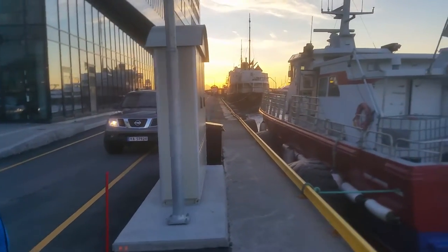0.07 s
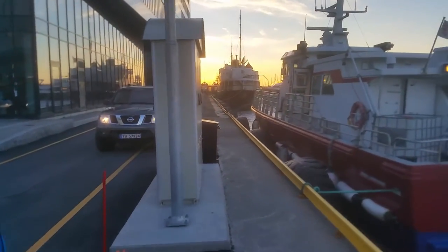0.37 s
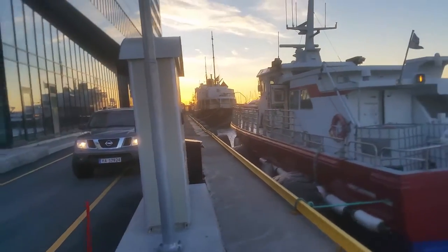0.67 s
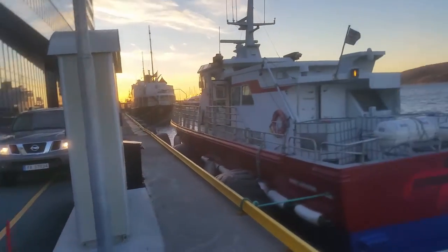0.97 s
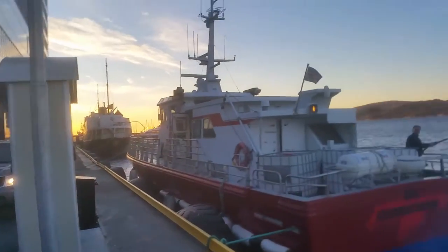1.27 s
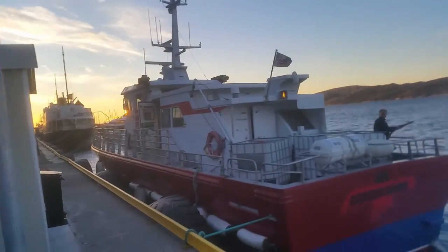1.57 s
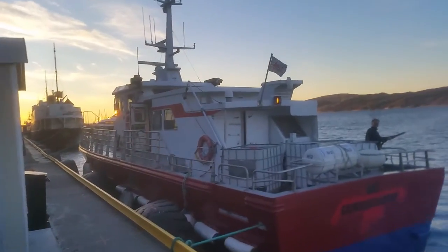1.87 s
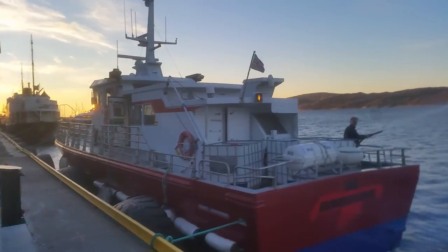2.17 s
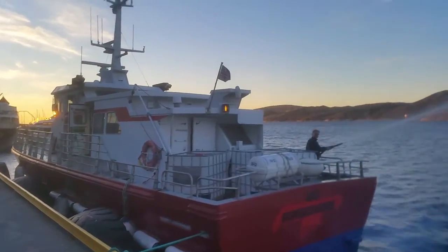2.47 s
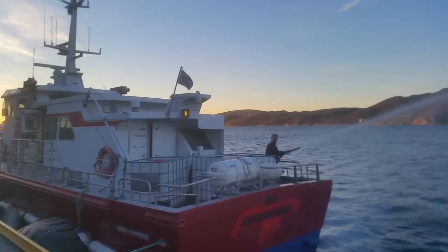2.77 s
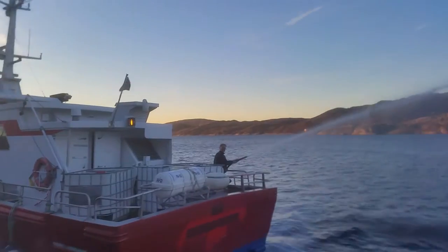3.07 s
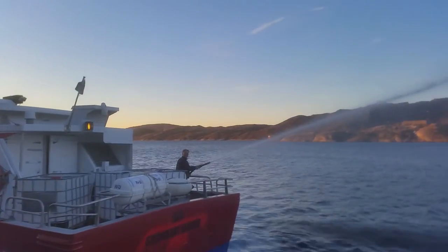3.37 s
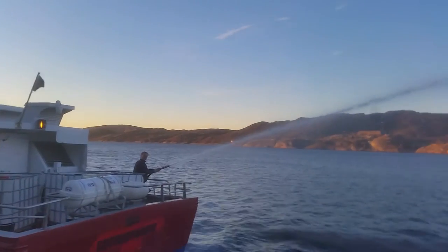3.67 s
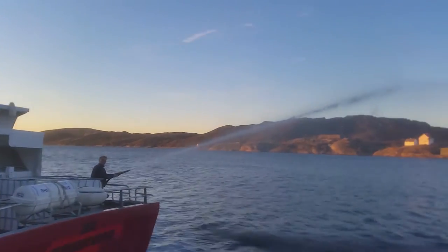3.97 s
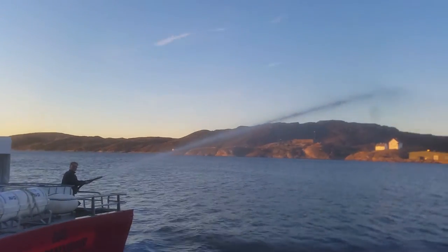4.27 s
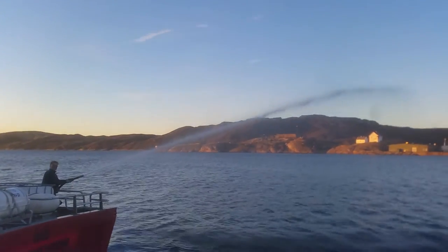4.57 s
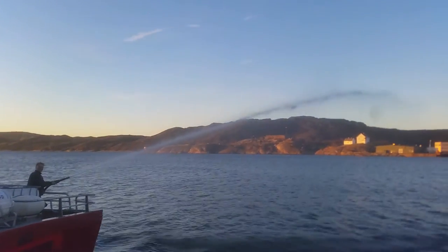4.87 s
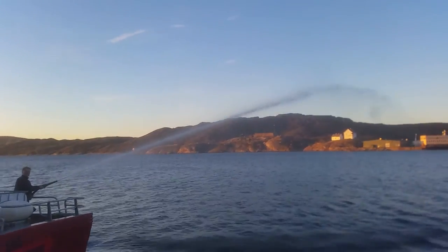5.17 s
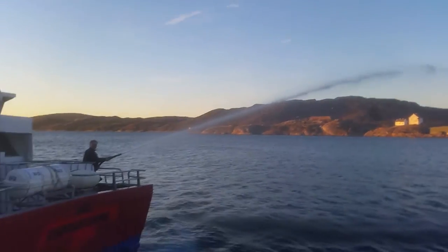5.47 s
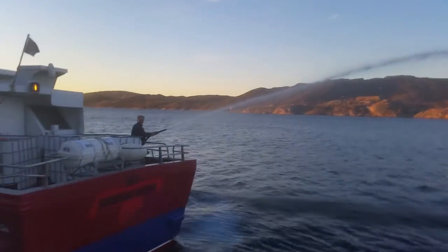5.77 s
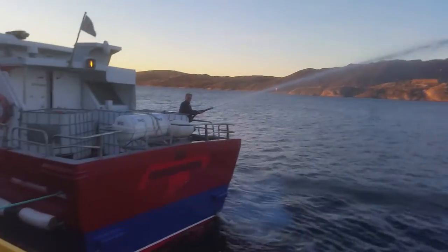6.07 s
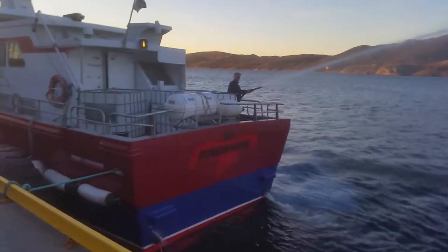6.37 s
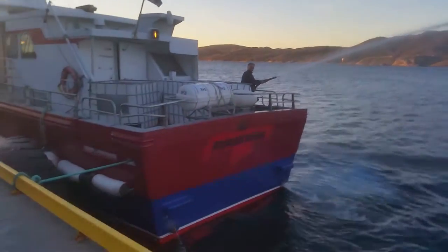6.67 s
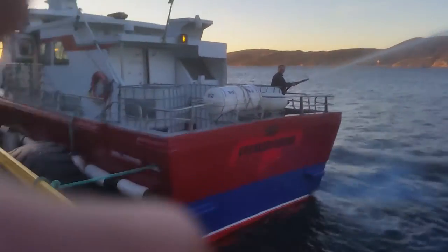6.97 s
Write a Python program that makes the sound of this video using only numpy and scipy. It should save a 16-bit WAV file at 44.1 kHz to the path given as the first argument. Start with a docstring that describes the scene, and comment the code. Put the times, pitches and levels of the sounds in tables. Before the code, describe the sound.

Low throbbing boat engine, steady pump whine and spray hiss at a quay, with wind gusts and small handling clicks.

```python
"""Workboat throwing a water jet.

A moored boat runs its diesel and fire pump while a deck monitor throws a jet over the harbour.
The exhaust throbs once an engine cycle, the pump whines, machinery roars and the spray hisses.
A hand-held phone on the quay comes out from behind a pillar and turns seaward, then partly back.
Wind buffets its two microphone ports and a finger brushes it."""
import sys
import numpy as np
from scipy import signal
from scipy.fft import rfft, irfft
from scipy.io import wavfile
from scipy.ndimage import map_coordinates

SR = 44100
rng = np.random.default_rng(int(sys.argv[2]) if len(sys.argv) > 2 else 0)


def bounce(signal):
    """Save signal as a 16-bit WAV file at the path given by the first command-line argument."""
    frames = np.transpose(np.atleast_2d(signal))
    limited = np.clip(frames, -1, 1)
    pcm = np.round(limited * 32767).astype(np.int16)
    wavfile.write(sys.argv[1], SR, pcm)


N = 318402
TIME_S = np.arange(N) / SR
BIN_HZ = np.maximum(np.fft.rfftfreq(N, 1 / SR), 1)


def undb(db):
    return 10 ** (np.asarray(db) / 20)


def stereo(left_db, right_db):
    return undb([[left_db], [right_db]])


def unit_rms(x):
    return x / np.sqrt(np.mean(x ** 2))


def curves(table):
    """Each column after the time, interpolated per sample."""
    times_s, *columns = np.transpose(table)
    return [np.interp(TIME_S, times_s, column) for column in columns]


def bump(centre_s, half_width_s):
    """Gaussian swell, peak 1."""
    return np.exp(-((TIME_S - centre_s) / half_width_s) ** 2)


def colour(hz, db):
    """Gain per bin from points joined over log frequency."""
    return undb(np.interp(np.log(BIN_HZ), np.log(hz), db))


def resonance(hz, width_hz):
    """Band-pass gain per bin."""
    return 1 / (1 + ((BIN_HZ ** 2 - hz ** 2) / (BIN_HZ * width_hz)) ** 2)


def lowpass(hz, order):
    return 1 / (1 + (BIN_HZ / hz) ** order)


def highpass(hz, order):
    return 1 / (1 + (hz / BIN_HZ) ** order)


def shape(x, gain):
    return irfft(rfft(x) * gain, N)


def noise(gain, envelope=1):
    """White noise, modulated, then filtered; rms 1."""
    return unit_rms(shape(rng.standard_normal(N) * envelope, gain))


def band_rms(x, low_hz, high_hz):
    """In-band rms of the mean of both channels."""
    return np.std(shape(x.mean(0), (BIN_HZ > low_hz) & (BIN_HZ < high_hz)))


def walk(rate_hz):
    """Smooth random drift, mean 0, rms 1."""
    gain = np.exp(-(BIN_HZ / rate_hz) ** 2)
    gain[0] = 0
    return noise(gain)


def ports(x, heading, right_lead_ms=0.294, swing_ms=0.603):
    """Lag between the ports: the boat moves from right to left as the phone turns."""
    lag = (right_lead_ms - swing_ms * heading) * SR / 1000
    return np.array([map_coordinates(x, [np.arange(N) - side * lag / 2], order=3, mode="mirror")
                     for side in (1, -1)])


# Eddy spectrum. Each row: frequency in Hz, relative level in dB.
EDDY_SPECTRUM = [(15, -26), (25, -9), (40, -4.5), (58, -1), (100, -4.5), (160, -2), (300, -15.5),
                 (700, -56)]
# Gusts. Each row: peak time in seconds, half width in seconds, centre in Hz, left and right level in dB.
PORT_GUSTS = [(0.06, 0.057, 420, -37, -34), (0.253, 0.066, 190, -17, -45), (0.84, 0.034, 164, -15.5, -42),
              (1.0, 0.06, 45, -25, -42), (1.736, 0.044, 277, -46, -18), (1.894, 0.028, 292, -50, -20),
              (2.05, 0.16, 50.4, -14.5, -48), (2.3, 0.23, 100, -12.5, -45), (3.023, 0.14, 45.5, -17, -34),
              (3.98, 0.15, 92, -12, -41), (6.38, 0.11, 288, -42.5, -17.5), (6.88, 0.056, 58.7, -10.5, -36)]


def wind(hidden, level_db=-32.5, swell_db=1, swell_hz=7.5, lee_db=-1.5, left_bias_db=3.5):
    """Eddies rumble at each port, weaker behind the pillar, with a few harder gusts."""
    eddies = rng.standard_normal((2, N)) + 0.64 * rng.standard_normal(N)
    eddies = shape(eddies, colour(*np.transpose(EDDY_SPECTRUM)))
    breeze_db = level_db - swell_db * walk(swell_hz) + lee_db * hidden
    out = eddies / band_rms(eddies, 20, 62) * undb(breeze_db)
    out *= stereo(left_bias_db / 2, -left_bias_db / 2)
    for peak_s, half_width_s, hz, left_db, right_db in PORT_GUSTS:
        out += noise(resonance(hz, 1.03 * hz)) * bump(peak_s, half_width_s) * stereo(left_db, right_db)
    return out


# Grip ticks. Each row: start in seconds, low and top edge in Hz, rattle T60 in seconds,
# left and right level in dB (energy as rms over 2 ms).
GRIP_TICKS = [(.326, 320, 2000, .035, -19, -27), (.669, 800, 4800, .02, -33, -42),
              (.744, 900, 5000, .02, -38, -46), (.770, 600, 4800, .018, -19, -30),
              (.886, 350, 1200, .025, -21, -29), (.987, 400, 1700, .025, -24, -32),
              (1.13, 500, 1500, .025, -24, -28), (1.340, 1200, 5000, .025, -35, -41),
              (2.365, 500, 1500, .025, -21, -26), (2.587, 500, 1200, .025, -24, -13),
              (6.348, 400, 1300, .04, -25, -12)]


def grip(rattle_db=-18):
    """The grip ticks: each a snap and a short rattle of the case."""
    out = np.zeros((2, N))
    for start_s, low_hz, top_hz, t60_s, left_db, right_db in GRIP_TICKS:
        age_s = (np.arange(N) - round(start_s * SR)) / SR
        snap = age_s == 0
        rattle = rng.standard_normal(N) * (age_s > 0) * undb(-60 * np.abs(age_s) / t60_s)
        case = BIN_HZ ** -0.75 * highpass(low_hz, 4) * lowpass(top_hz, 16)
        tick = shape(snap + undb(rattle_db) * rattle, case)
        tick_rms = np.sqrt(np.sum(tick ** 2) / (0.002 * SR))
        out += tick / tick_rms * stereo(left_db, right_db)
    return out


# Finger slide at the left port. Each row: time in seconds, rub level in dB, scrape level in dB.
FINGER_LEVELS = [(6.8, -80, -90), (6.91, -32, -70), (6.98, -31.5, -65), (7.03, -33, -62.5),
                 (7.1, -27.5, -46), (7.115, -25.5, -31), (7.16, -38, -35), (7.19, -48, -63)]
# Rub spectrum. Each row: frequency in Hz, relative level in dB.
RUB_SPECTRUM = [(150, -11), (500, 2.5), (1500, -9), (3500, -13), (5800, -23), (8000, -23), (10000, -15),
                (15000, -21)]


def finger(rub_grain_db=2.0, scrape_grain_db=0.5):
    """A finger rubs, then scrapes along the case by the left port."""
    rub_db, scrape_db = curves(FINGER_LEVELS)
    rub = noise(colour(*np.transpose(RUB_SPECTRUM)), undb(rub_grain_db * walk(250)))
    scrape = noise(colour([1500, 5000, 15000], [0, -9, -11]), undb(scrape_grain_db * walk(500)))
    return (rub * undb(rub_db) + scrape * undb(scrape_db)) * stereo(0, -18)


# Hiss spectrum. Each row: frequency in Hz, relative dB left and right facing the boat, then the sea.
HISS_SPECTRUM = [(1750, 13, 19, 0, -18), (3500, -1, -1.5, -1, 2.5), (4350, -6, 3, -3.5, 7),
                 (5570, -11, 3.5, -12, 2.5), (6500, -9, 2, -7, 1), (7560, -8, 0.5, -4.5, 3.5),
                 (8700, 1, 2, 2, 4.5), (9900, 3, 2, 3.5, -1), (12100, -1, -0.5, 0, 1),
                 (13300, 0.5, 1, 1.5, -2), (15000, -4, 5, -4, 2)]
# Pillar's filter on the hiss. Each row: frequency in Hz, gain in dB.
PILLAR_FILTER = [(2000, -6), (4300, 6), (6500, 3.5), (9000, 2), (10200, -7.5), (13000, -4), (15000, -14)]
# How strongly spray and deck clatter carry. Each row: time in seconds, relative level in dB.
DECK_CARRY = [(0, -52.5), (0.5, -49.5), (0.7, -48), (1.6, -40), (2.5, -41.0), (3.3, -41.5), (3.78, -38.5),
              (4.05, -42.5), (4.2, -40), (4.35, -44.0), (4.75, -42.5), (5.15, -39), (6.25, -38.5),
              (6.75, -39), (7.22, -41)]


def spray(heading, hidden, gain_db=-6.5, direct_share=0.26, patter_db=0.4, surge_db=0.7, sway_db=0.68,
          case_hz=6410, case_width_hz=990, case_db=2.5, waver_depth=0.074, waver_hz=1.8):
    """The jet tears into countless drops; the phone's body colours their hiss as it turns."""
    direct = np.sqrt(direct_share) * ports(rng.standard_normal(N), heading)
    diffuse = np.sqrt(1 - direct_share) * rng.standard_normal((2, N))
    drops = (direct + diffuse) * undb(patter_db * walk(600) + surge_db * walk(41))
    hz, *columns_db = np.transpose(HISS_SPECTRUM)
    gains = np.array([colour(hz, db) for db in columns_db]) * highpass(1500, 4)
    seaward = np.clip((heading - 0.42) / 0.27, 0, 1)
    hiss = (1 - seaward) * shape(drops, gains[:2]) + seaward * shape(drops, gains[2:])
    hiss /= band_rms(hiss, 8000, 15500)
    # The case resonates at the right port while it faces the deck.
    facing_deck = (1 - hidden) * (1 - seaward)
    hiss[1] += shape(hiss[1], resonance(case_hz, case_width_hz)) * undb(case_db) * facing_deck
    for centre_hz in np.geomspace(4500, 14000, 4):
        hiss += waver_depth * walk(waver_hz) * shape(hiss, resonance(centre_hz, centre_hz / 3))
    # Short waves bend least around the pillar.
    dull = shape(hiss, colour(*np.transpose(PILLAR_FILTER)))
    level_db = curves(DECK_CARRY)[0] + gain_db + sway_db * walk(9.6)
    return ((1 - hidden) * hiss + hidden * dull) * undb(level_db)


# Pump tones. Each row: harmonic number, left and right gain in dB.
PUMP_HARMONICS = [(1, 1, 2.5), (2, -18, -15)]
# Swell of the whine. Each row: time in seconds, relative level in dB.
WHINE_SWELL = [(0, -29.0), (0.55, -30.0), (0.7, -25), (1.12, -27.5), (1.35, -22.5), (1.65, -22.5),
               (1.8, -25.0), (3.42, -25.5), (3.58, -23.5), (4.45, -26.5), (5.0, -26), (5.25, -21),
               (5.42, -25.0), (6.05, -22.5), (6.4, -26), (7.22, -27.5)]


def pump(heading, whine_hz=486.1, drift_hz=0.55, flutter_rad=0.08, flutter_db=2.2, gain_db=0.3):
    """The pump's whine and its octave, fluttering with the flow."""
    phase = 2 * np.pi * np.cumsum(whine_hz + drift_hz * walk(0.7)) / SR + flutter_rad * walk(11)
    out = np.zeros((2, N))
    for harmonic, left_db, right_db in PUMP_HARMONICS:
        tone = np.sin(harmonic * phase) * undb(flutter_db * walk(17.6))
        out += ports(tone, heading) * stereo(left_db, right_db)
    return out * undb(curves(WHINE_SWELL)[0] + gain_db)


CYCLE_HZ, FIRINGS_PER_CYCLE = 12.208, 6  # four-stroke diesel
# Roar spectrum. Each row: frequency in Hz, left and right relative level in dB.
ROAR_SPECTRUM = [(60, -16, -13), (100, -10, 4), (144, -5.5, -4.5), (215, -14, -9), (346, -15, -10.5),
                 (393, -7.5, -16), (440, -10, -6), (515, -15.5, -13), (615, -21.5, -19), (788, -18, -16),
                 (1146, -30, -23.5), (1680, -34.5, -24), (2260, -32, -30), (3080, -42, -43)]
# Machinery and hull resonances. Each row: centre in Hz, width in Hz, unshadowed level in dB re the roar.
HULL_RINGS = [(424.7, 18, -18.5), (715, 67, -19), (1301, 14, -27), (1586, 23, -27.5), (1696, 30, -27.5),
              (1870, 1200, -37.5)]
# How strongly the exhaust and the roar's body carry. Each row: time in seconds, relative level in dB.
ENGINE_CARRY = [(0, -15), (0.5, -18.5), (0.85, -16.5), (1.0, -15), (1.55, -10.5), (2.0, -9), (2.45, -11.5),
                (3.25, -11.0), (3.65, -9.0), (4.3, -12.0), (4.77, -14), (5.0, -9.5), (5.3, -8.5),
                (6.35, -10.0), (6.75, -8.5), (7.05, -11.5), (7.22, -9)]


def machinery(heading, hidden, body_gain_db=-19.5, clatter_gain_db=0.52, swell_db=1.6, unrest_db=1.23,
              knock_depth=0.13, flicker_db=1, crossover_hz=680):
    """Gas roar and clatter pulse with the firings; bass comes direct, treble off many surfaces."""
    body_db = curves(ENGINE_CARRY)[0] + body_gain_db + swell_db * walk(2)
    clatter_db = curves(DECK_CARRY)[0] + clatter_gain_db + unrest_db * walk(12)
    diffuse_share = np.minimum(0.088 + highpass(1300, 2), 0.7)
    direct = shape(ports(rng.standard_normal(N), heading), np.sqrt(1 - diffuse_share))
    diffuse = shape(rng.standard_normal((2, N)), np.sqrt(diffuse_share))
    knock = 1 + knock_depth * np.cos(2 * np.pi * FIRINGS_PER_CYCLE * CYCLE_HZ * TIME_S)
    pulsing = (direct + diffuse) * knock * undb(flicker_db * walk(51))
    hz, left_db, right_db = np.transpose(ROAR_SPECTRUM)
    gains = np.array([colour(hz, left_db), colour(hz, right_db)]) * highpass(45, 4) * lowpass(3300, 8)
    roar = unit_rms(shape(pulsing, gains))
    pillar_gain = 1 - 0.42 * hidden
    for ring_hz, width_hz, db in HULL_RINGS:
        roar += pillar_gain * undb(db) * ports(noise(resonance(ring_hz, width_hz)), heading)
    body = shape(roar, lowpass(crossover_hz, 4))
    clatter = roar - body
    body_rms, clatter_rms = band_rms(roar, 280, 460), band_rms(roar, 1100, 2500)
    return body / body_rms * undb(body_db) + clatter / clatter_rms * undb(clatter_db)


# Exhaust lines. Each row: multiple of the cycle rate, relative level in dB.
EXHAUST_ORDERS = [(3, -22), (6, 0), (7, -.5), (9, -10), (11, -6.7), (12, -7.5), (13, -7.7), (15, -8.3),
                  (16, -17), (20, -20.5), (21, -12.3), (22, -18), (25, -25), (26, -20), (28, -19),
                  (31, -22), (33, -25), (35, -21.5), (37, -18), (43, -24), (46, -24)]


def exhaust(heading, gain_db=-5, first_throb_s=0.054, waver_db=0.78, wander_rad=0.08, dispersion=0.09):
    """Uneven firings: orders 6 and 7 beat into a throb; pipe and hull delay higher orders more."""
    cycle_phase = 2 * np.pi * (CYCLE_HZ * (TIME_S - first_throb_s) + 0.004 * walk(3))
    out = np.zeros(N)
    for order, db in EXHAUST_ORDERS:
        offset = order - 6.5
        lag_rad = np.pi * dispersion * offset ** 2
        drift_rad = wander_rad * np.sqrt(abs(offset)) * walk(1.75)
        line_db = db + waver_db * min(order / 10, 2) * walk(3)
        out += undb(line_db) * np.cos(order * cycle_phase - lag_rad + drift_rad)
    return ports(out, heading) * undb(curves(ENGINE_CARRY)[0] + gain_db)


# The phone's turn. Each row: time in seconds, heading from 0 (along the quay) to 1 (out to sea).
PHONE_HEADING = [(0.7, 0), (1.5, 0.32), (2.2, 0.37), (3.0, 0.59), (3.6, 0.72), (4.4, 0.9), (5.2, 0.94),
                 (6.0, 0.756), (6.6, 0.75), (7.22, 0.76)]
# Pillar shadow. Each row: time in seconds, share of the deck and its spray hidden.
PILLAR_SHADOW = [(0, 1), (.48, 0.91), (.65, 0.47), (1.2, 0.038)]
# Dips in the boat's sound at hard gusts. Each row: centre in seconds, half width in seconds, gain in dB.
GUST_DIPS = [(2.37, 0.017, -5), (4.0, 0.033, -4.5), (6.375, 0.043, -3), (6.91, 0.041, -5)]


def scene(exhaust_dip_share=0.3):
    """The boat as the turning phone hears it, with wind and fingers at the ports."""
    heading, = curves(PHONE_HEADING)
    hidden, = curves(PILLAR_SHADOW)
    dip_db = sum(db * bump(centre_s, half_width_s) for centre_s, half_width_s, db in GUST_DIPS)
    throb = exhaust(heading) * undb(exhaust_dip_share * dip_db)
    deck = (pump(heading) + machinery(heading, hidden) + spray(heading, hidden)) * undb(dip_db)
    return throb + deck + wind(hidden) + grip() + finger()


def record(dry, top_hz=15700):
    """The phone rounds peaks near full scale and cuts the top."""
    rounded = dry / (1 + np.abs(dry) ** 8) ** (1 / 8)
    return signal.sosfilt(signal.ellip(12, 0.1, 90, top_hz, fs=SR, output="sos"), rounded)


dry = scene()
out = record(dry)
bounce(out)
```